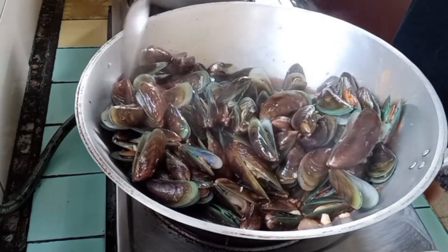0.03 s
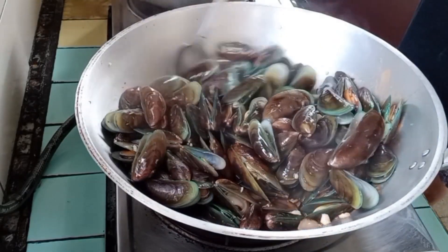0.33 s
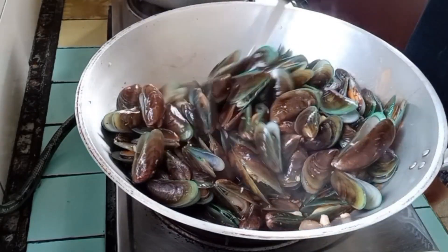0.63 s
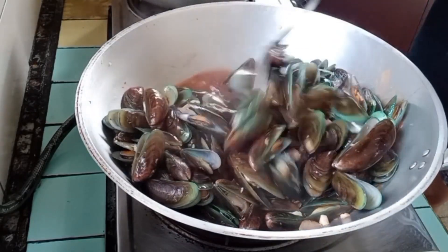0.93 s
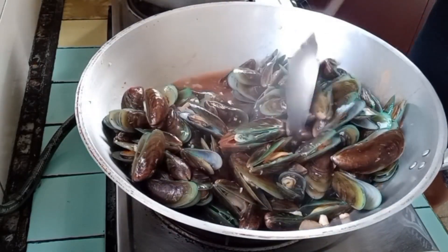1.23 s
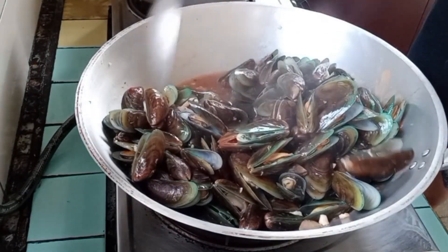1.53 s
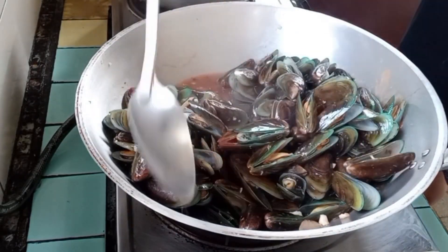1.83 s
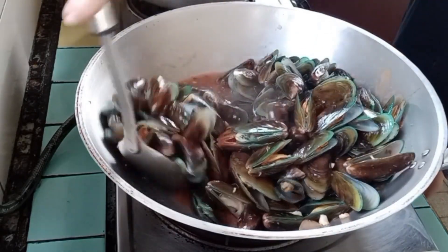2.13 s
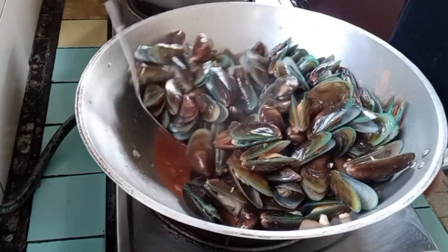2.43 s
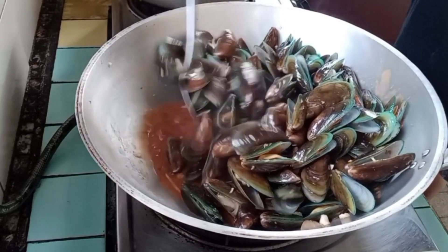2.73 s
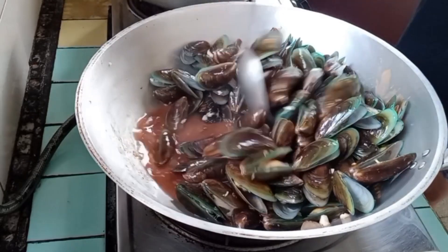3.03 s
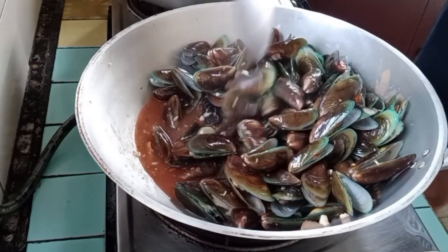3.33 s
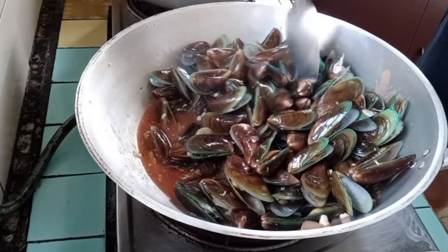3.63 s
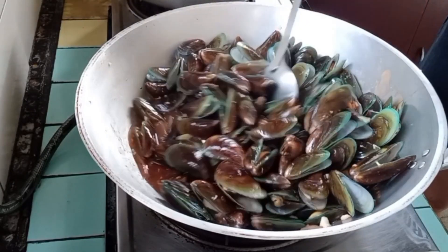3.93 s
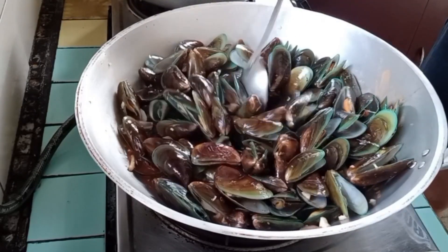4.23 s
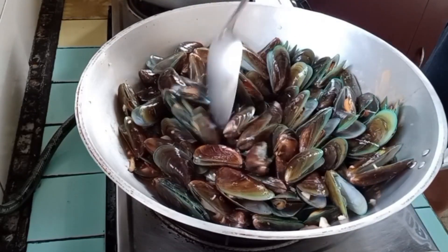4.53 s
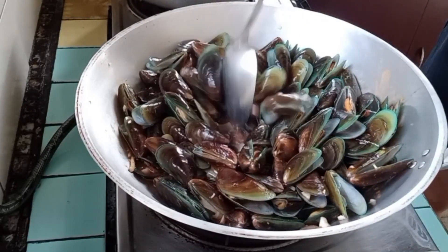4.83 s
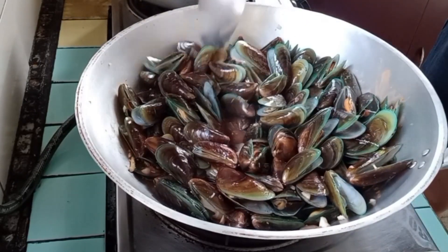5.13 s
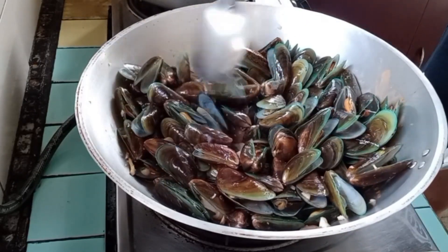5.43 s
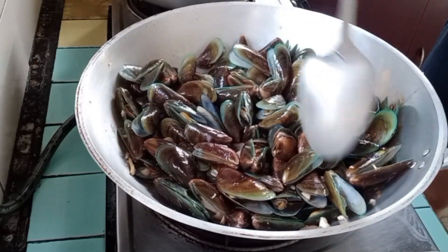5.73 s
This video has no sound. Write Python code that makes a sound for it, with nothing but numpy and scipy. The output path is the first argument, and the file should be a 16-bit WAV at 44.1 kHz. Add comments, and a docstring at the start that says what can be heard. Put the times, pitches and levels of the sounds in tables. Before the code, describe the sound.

A steel spoon turns mussels in sauce in an aluminium wok, heard close up with slight small-kitchen reverberation. From the start to about 1.1 seconds, hollow shells clack and grind, with bright spoon pings and wet squelches. Each knock makes the wok ring briefly, and the pushes bring a soft low rumble. The sound thins to a few shell ticks, almost stopping before 1.9 seconds. Stirring then resumes in uneven bursts, with light scraping and a strong clatter around 2.8 seconds. From 3.6 to 4.9 seconds the shells rattle busily and the sauce sloshes with deeper gulps; the loudest cluster of strikes comes at about 4.8 seconds. A faint low drone comes up from around 4.4 seconds and wavers to the end. Lighter clicks follow after 5 seconds, then sharp spoon hits and a short scrape at about 5.8 to 5.9 seconds.

```python
"""A steel spoon pings and hollow shells clack: mussels in sauce are turned in an aluminium wok, close by.
Each impact excites the damped modes of spoon and shells; sliding edges grind by friction.
Underneath, air pockets resonate in the sauce, the small ones as a squelch, the large ones as a gulp.
The bowl reflects each knock and rings briefly, and the small kitchen reverberates.
A faint low drone comes up towards the end."""
import sys
import numpy as np
from scipy import signal
from scipy.io import wavfile
from scipy.ndimage import uniform_filter1d

SR = 44100
rng = np.random.default_rng(int(sys.argv[2]) if len(sys.argv) > 2 else 0)


def bounce(signal):
    """Save signal as a 16-bit WAV file at the path given by the first command-line argument."""
    frames = np.transpose(np.atleast_2d(signal))
    limited = np.clip(frames, -1, 1)
    pcm = np.round(limited * 32767).astype(np.int16)
    wavfile.write(sys.argv[1], SR, pcm)


N = 263718
TIME = np.arange(N) / SR
RING_TIME = TIME[:8192]
ONSET = 220  # samples: an impact's level is set over its first 5 ms


def amp(db):
    """Amplitude ratio of a level in decibels."""
    return 10 ** (np.asarray(db) / 20)


def unit(x, size=None):
    """Normalisation to rms 1 over the first size samples."""
    return x / np.sqrt(np.mean(x[:size] ** 2) + 1e-20)


def value_at(points, hz):
    """Interpolation on a logarithmic frequency axis."""
    f, value = np.transpose(points)
    return np.interp(np.log(hz + 1), np.log(f), value)


def add(mix, start, sound):
    """Superposition of a sound on the mix, from start in seconds."""
    part = mix[max(round(start * SR), 0):][:len(sound)]
    part += sound[:len(part)]


def colour(x, spectrum, size=2048):
    """Minimum-phase filtering: the response is causal, so attacks stay sharp."""
    log_gain = np.log(amp(value_at(spectrum, abs(np.fft.fftfreq(size, 1 / SR)))))
    taps = np.fft.ifft(np.exp(np.conj(signal.hilbert(log_gain)))).real
    return signal.fftconvolve(x, taps[:size // 2])[:len(x)]


def waver(top_hz):
    """Slow fluctuation of rms 1: a sum of sinusoids in random phase."""
    t = TIME[::100]
    slow = sum(np.sin(2 * np.pi * (f * t + rng.random())) for f in np.geomspace(top_hz / 6, top_hz, 24))
    return unit(np.interp(TIME, t, slow))


def mode(hz, t60):
    """Free vibration of a damped oscillator, falling 60 dB in t60 seconds."""
    return np.sin(2 * np.pi * hz * RING_TIME) * np.exp(-np.log(1000) * RING_TIME / t60)


def ring(modes, spread_db):
    """Modal superposition: each mode's share and sign vary by chance, as with the point of contact."""
    return sum(amp(db + spread_db * rng.standard_normal()) * rng.choice([-1, 1]) * mode(hz, t60)
               for hz, db, t60 in modes)


def contact(t60, spectrum):
    """Rough contact: micro-impacts form a noise burst that builds up in about a millisecond."""
    t = RING_TIME[:len(RING_TIME) // 2]
    envelope = np.exp(-np.log(1000) * t / t60) * (1 - np.exp(-t / 0.001))
    burst = rng.standard_normal(len(t)) * envelope
    return np.pad(colour(burst, spectrum), (0, len(t)))


def scatter(grains, per_s, spread_db):
    """Shot noise: grains of uneven size arrive at random, levelled to a mean power near 1."""
    out = np.zeros(N)
    for grain in grains:
        sizes = amp(spread_db * np.minimum(rng.exponential(1, N), 3))
        arrivals = rng.random(N) < per_s / len(grains) / SR
        out += signal.oaconvolve(sizes * arrivals, grain)[:N]
    out = unit(out)
    power = uniform_filter1d(uniform_filter1d(out ** 2, size=1300), size=900)
    return out / np.sqrt(abs(power) + .03)


def effort(rows, column, attack_s, sag_db_per_s, release_db_per_s):
    """Incoherent addition: the envelopes of movements, each rising, sagging and dying, sum in power."""
    power, t = np.zeros(N), TIME[:SR]
    for row in rows:
        start, end = row[:2]
        fall_db = sag_db_per_s * t + release_db_per_s * np.maximum(t - (end - start), 0)
        add(power, start, (np.minimum(t / attack_s, 1) * amp(row[column] - fall_db)) ** 2)
    return np.sqrt(power)


# Spectrum of the room air: f/Hz, level/dB
AIR_SPECTRUM = [(20, -28.5), (70, -15), (120, 3.5), (170, -8), (400, -13.5), (1000, -17.5), (2300, -20.5),
                (4800, -35.5), (7700, -30), (9800, -35.5), (10900, -18), (11700, -47.5), (16000, -36)]
def room_air():
    """Stationary coloured noise forms the quiet floor of the room."""
    return amp(-76.5) * unit(colour(rng.standard_normal(N), AIR_SPECTRUM, size=8192))


# Course of the low drone: t/s, f/Hz, level/dB
DRONE_COURSE = [(4.1, 59.4, -94), (4.43, 60.56, -67.5), (4.87, 69.2, -57.5), (5.02, 68.3, -74.5),
                (5.12, 69.5, -61.5), (5.28, 69.5, -71), (5.6, 69.2, -58), (5.74, 71, -72.5),
                (5.86, 69.8, -60)]
def drone():
    """A low tone and its weaker octave waver by slow frequency and amplitude modulation."""
    times, hz, db = np.transpose(DRONE_COURSE)
    turns = np.cumsum(np.interp(TIME, times, hz) * (1 + 0.024 * waver(top_hz=4.7))) / SR
    octave = amp(-11 + 6.5 * waver(top_hz=12)) * np.sin(4 * np.pi * turns)
    level_db = np.interp(TIME, times, db) + 1.8 * waver(top_hz=16)
    return amp(level_db) * unit(np.sin(2 * np.pi * turns) + octave)


def echoes(delay_s, decay, per_s):
    """Impulse response of energy 1: sparse reflections, absorbed by band (decay: f/Hz, T60/s)."""
    t = TIME[:SR // 2]
    taps = rng.choice([-1., 1.], len(t)) * (rng.random(len(t)) < per_s / SR) * (t > delay_s)
    hz, age, bands = signal.stft(taps, SR, nperseg=128)
    absorption = np.exp(-np.log(1000) * age / value_at(decay, hz)[:, None])
    tail = signal.istft(bands * absorption, SR, nperseg=128)[1]
    return tail / np.linalg.norm(tail)


# Reverberation time of the kitchen: f/Hz, T60/s
KITCHEN_DECAY = [(150, 0.56), (500, 0.16), (1200, 0.31), (3000, 0.23), (8000, 0.22), (15000, 0.31)]
def kitchen(x):
    """Reverberation: the nearby walls return the sound from 8 ms on."""
    return amp(-9) * signal.oaconvolve(x, echoes(.008, KITCHEN_DECAY, per_s=4000))[:N]


def bowl(x):
    """Early reflections join the direct sound; seven patterns crossfade as the spoon wanders."""
    out = x.copy()
    for k in range(7):
        weight = np.cos(np.pi * np.clip((TIME * 6 - k + 1) % 7 - 1, -1, 1) / 2)
        reflections = echoes(.0014, [(300, 0.044), (12000, 0.022)], per_s=3000)
        out += amp(-7.5) * signal.oaconvolve(x * weight, reflections)[:N]
    return out


# Modes of the loaded wok: f/Hz, level/dB, T60/s
WOK_MODES = [(223, -4, .4), (310, -2, .45), (440, -6, .3), (560, -7, .3), (972, -3, .35), (1275, -3, .35),
             (1393, 0, .36), (1561, -2, .26), (1605, -6, .22), (1678, -5, .28), (1832, -1, .3),
             (1945, -2, .26), (2259, -2, .2), (2360, -3, .2), (2745, -6, .2), (3302, -3, .22),
             (3454, -3, .28)]
def wok_ring(x):
    """Forced vibration: the contents drive the modes of the pan."""
    pan = sum(amp(db) * rng.choice([-1, 1]) * mode(hz, t60) for hz, db, t60 in WOK_MODES)
    return amp(-19.5) * signal.oaconvolve(x, pan / np.linalg.norm(pan))[:N]


# Slides of the spoon on the pan: start t/s, end t/s, cavity f/Hz, level/dB
SPOON_SLIDES = [(2.197, 2.37, 820, -62.5), (2.435, 2.68, 856, -68), (3.102, 3.478, 820, -68),
                (5.246, 5.366, 960, -60.5), (5.847, 5.928, 995, -50)]
def slides():
    """Stick-slip friction at the spoon's edge excites the cavity between spoon and pan."""
    out = np.zeros(N)
    for start, end, hz, db in SPOON_SLIDES:
        size = int((end - start) * SR)
        slips = rng.standard_normal(size) * (rng.random(size) < 700 / SR)
        cavity = signal.fftconvolve(slips, mode(hz, t60=.028))[:size]
        add(out, start, amp(db) * unit(cavity) * signal.windows.tukey(size, .4))
    return out


def bubble(hz, cycles, rise):
    """Bubble resonance: an air pocket pulsates, rising in pitch as it nears the surface."""
    age = RING_TIME * hz / cycles  # 1 when 60 dB down
    turns = hz * RING_TIME * (1 + rise * np.minimum(age, 1))
    envelope = np.exp(-np.log(1000) * age) * (1 - np.exp(-hz * RING_TIME))
    return unit(np.sin(2 * np.pi * turns) * envelope)


# Sauce shoved aside and running back: start t/s, end t/s, squelch level/dB, gulp level/dB
SAUCE_SLOSHES = [(0.11, 0.2, -46.5, -67), (0.21, 0.31, -43, -66), (0.435, 0.55, -48.5, -64),
                 (0.7, 0.82, -60.5, -70), (0.89, 1.01, -50, -65), (2.06, 2.2, -50.5, -64),
                 (2.27, 2.33, -54.5, -84), (2.49, 2.57, -63.5, -77), (2.7, 2.77, -57, -81),
                 (2.78, 2.84, -49.5, -62), (2.98, 3.14, -46.5, -68.5), (3.27, 3.45, -68, -78),
                 (3.72, 3.82, -41, -58.5), (3.86, 4.04, -46, -55), (4.07, 4.25, -42, -40.5),
                 (4.33, 4.52, -49, -43.5), (4.76, 4.85, -42, -50), (5.24, 5.35, -80, -64.5),
                 (5.85, 5.92, -52, -81)]
def sauce():
    """Resonance falls with size: small bubbles squelch between shells, large ones gulp behind the spoon."""
    small = [bubble(hz, cycles=44, rise=0.26) for hz in np.geomspace(410, 1020, 26)]
    large = [bubble(hz, cycles=17, rise=0.25) for hz in np.geomspace(180, 400, 14)]
    shape = dict(attack_s=0.011, sag_db_per_s=83.5, release_db_per_s=173)
    squelch = effort(SAUCE_SLOSHES, column=2, **shape) * scatter(small, per_s=170, spread_db=0)
    gulp = effort(SAUCE_SLOSHES, column=3, **shape) * scatter(large, per_s=190, spread_db=-1.5)
    return squelch + gulp


# Contact spectrum of a shell's edge: f/Hz, level/dB
TICK_SPECTRUM = [(1500, -23), (3800, 5), (4800, -9.5), (5800, -4), (7600, 3), (9000, -6), (9600, -3),
                 (11000, -13), (13000, -11.5), (15500, -23.5)]
def tick(t60, top_hz):
    """Contact compliance acts as a low-pass: a softer touch of a shell's edge has less treble."""
    lowpass = signal.butter(2, min(top_hz, .45 * SR), fs=SR, output="sos")
    return unit(signal.sosfilt(lowpass, contact(t60, TICK_SPECTRUM)), ONSET)


# Contact spectrum of colliding shells: f/Hz, level/dB
CRACK_SPECTRUM = [(300, -33.5), (800, -0.5), (1500, -2), (3400, 4), (4200, -7.5), (5000, -24.5),
                  (8000, -27)]
def clack(hz, other_hz, cycles, other_db, crack_db):
    """Two hollow shells ring on impact; radiation is weak below the pitch of the larger one."""
    main = unit(mode(hz, cycles / hz), ONSET)
    other = rng.choice([-1, 1]) * unit(mode(other_hz, cycles / other_hz), ONSET)
    crack = unit(contact(0.03, CRACK_SPECTRUM), ONSET)
    band = signal.butter(3, [.66 * min(hz, other_hz), 4300], "band", fs=SR, output="sos")
    return unit(signal.sosfilt(band, main + amp(other_db) * other + amp(crack_db) * crack), ONSET)


# Contact spectrum of shell against metal: f/Hz, level/dB
SCRAPE_SPECTRUM = [(1500, -31.5), (3800, -4.5), (4800, -13), (5800, -5.5), (8200, 3.5), (9000, -2.5),
                   (9600, -5), (10600, -3.5), (12100, -12), (13800, -10.5), (15200, -12), (16000, -17)]
def scratch(t60):
    """Friction between hard, rough surfaces gives a bright burst of noise."""
    return contact(t60, SCRAPE_SPECTRUM)


# Modes of the steel spoon, damped by the food: f/Hz, level/dB, T60/s
STEEL_MODES = [(6010, -10, .05), (7290, -5, .08), (7607, -2, .13), (7990, -7, .05), (8450, -7, .04),
               (9082, -1, .1), (10430, -4, .07), (11108, -4, .09), (11815, -5, .05), (12090, -3, .07),
               (13000, -7, .04), (15000, -10, .03)]
def steel_ring(detune, spread_db):
    """Mass loading: the food shifts each mode of the spoon at random, by up to the fraction detune."""
    modes = [(hz * rng.uniform(1 - detune, 1 + detune), db, t60) for hz, db, t60 in STEEL_MODES]
    return ring(modes, spread_db)


def rocking():
    """Structure-borne noise: the pan rumbles on its stand."""
    spectrum = [(20, -1), (55, -4), (125, 19.5), (200, -39), (400, -47.5)]  # f/Hz, level/dB
    return amp(-25) * unit(colour(rng.standard_normal(N), spectrum, size=8192))


def grinding(gain):
    """Friction of edges: light contact crackles, harder pressure scrapes shell against metal."""
    ticks = [unit(tick(t60=0.0042, top_hz=hz)) for hz in np.geomspace(7000, 13000, 12)]
    scratches = [unit(scratch(t60=0.0037)) for _ in range(8)]
    crackle = scatter(ticks, per_s=710, spread_db=8)
    scrape = scatter(scratches, per_s=1600, spread_db=4.5)
    scrape_share = np.clip((20 * np.log10(gain + 1e-9) + 71) / 24, .05, .8)
    grit = gain * (np.sqrt(1 - scrape_share) * crackle + np.sqrt(scrape_share) * scrape)
    steel = steel_ring(detune=0, spread_db=1)  # dragged edges faintly excite the spoon
    return grit + amp(-16.5) * signal.oaconvolve(grit, steel / np.linalg.norm(steel))[:N]


def clatter():
    """Many small, independent collisions of shells merge into shot noise."""
    clacks = [clack(hz, hz * rng.uniform(0.727, 1.331), cycles=31, other_db=-1.5, crack_db=-6)
              for hz in np.geomspace(1100, 3100, 36)]
    return scatter(clacks, per_s=400, spread_db=3.5)


def loose_shells(per_s):
    """A sparse random process: tumbling shells land far enough apart to be heard singly."""
    out = np.zeros(N)
    lands = rng.random(N) < per_s / SR
    which = rng.integers(0, 12, N)
    for k, hz in enumerate(np.geomspace(1450, 3400, 12)):
        knock = clack(hz, hz * rng.uniform(0.42, 1.4), cycles=36, other_db=-12.5, crack_db=-3.5)
        knock += amp(-8) * tick(t60=0.0091, top_hz=12000)
        out += signal.oaconvolve(1. * (lands & (which == k)), knock)[:N]
    return amp(-1.5) * out


# Pushes of the spoon on the heap: start t/s, end t/s, clatter level/dB, grinding level/dB
HEAP_PUSHES = [(0.06, 0.1, -51, -54.5), (0.11, 0.2, -51, -48), (0.21, 0.28, -43.5, -46),
               (0.36, 0.43, -54, -60), (0.445, 0.5, -48, -56.5), (0.52, 0.67, -56, -77),
               (0.68, 0.88, -44, -59.5), (0.89, 1.05, -42.5, -51.5), (1.08, 1.17, -66.5, -67),
               (1.24, 1.38, -65.5, -69), (1.93, 1.96, -55.5, -67), (2.05, 2.16, -50, -53),
               (2.27, 2.32, -52, -57), (2.44, 2.68, -64, -74.5), (2.70, 2.77, -43.5, -55),
               (2.78, 2.87, -42, -57), (2.95, 3.06, -43, -59.5), (3.08, 3.18, -52, -63.5),
               (3.27, 3.44, -58, -71), (3.53, 3.59, -58.5, -59.5), (3.62, 3.72, -44.5, -50),
               (3.73, 3.81, -39, -51), (3.84, 3.9, -47.5, -59), (3.96, 4.28, -49.5, -68.5),
               (4.32, 4.39, -56, -60.5), (4.43, 4.54, -50, -54), (4.62, 4.7, -51.5, -70),
               (4.715, 4.88, -40, -52), (5.01, 5.04, -68, -79), (5.115, 5.18, -57.5, -65),
               (5.21, 5.35, -53.5, -61), (5.49, 5.6, -64.5, -65), (5.81, 5.93, -48.5, -49)]
def heap():
    """Granular flow: each push makes shells collide and grind. Returns their sound and the pan's rumble."""
    push = effort(HEAP_PUSHES, column=2, attack_s=0.0072, sag_db_per_s=18, release_db_per_s=274)
    grind = effort(HEAP_PUSHES, column=3, attack_s=0.0041, sag_db_per_s=28, release_db_per_s=277)
    collisions = push * (clatter() + loose_shells(per_s=20))
    return collisions + grinding(grind), push * rocking()


# Prominent knocks of shell on shell: t/s, first f/Hz, second f/Hz, clack level/dB, tick level/dB
SHELL_KNOCKS = [(0.1706, 2170, 1880, -41.5, -53), (0.279, 3100, 2640, -34.5, -54),
                (0.3399, 2650, 2190, -41, -41.5), (0.3644, 3120, 2280, -34, -38.5),
                (0.567, 2630, 3150, -38, -83.5), (0.667, 2770, 2297, -46, -59.5),
                (0.694, 1603, 1780, -29, -60), (0.7141, 1370, 2460, -39.5, -49),
                (0.751, 2730, 2410, -35.5, -47.5), (0.8611, 1720, 3320, -37.5, -51),
                (0.906, 2430, 1320, -32.5, -44.5), (0.9528, 3310, 3200, -35.5, -39),
                (0.9823, 2790, 3070, -35.5, -39.5), (1.018, 2200, 2580, -38.5, -37.5),
                (1.054, 3360, 2790, -35, -42), (1.206, 2730, 3550, -48.5, -57),
                (1.3177, 2600, 4280, -37.5, -46), (1.468, 2770, 3530, -50.5, -75),
                (1.5686, 2380, 3080, -63, -65.5), (2.2057, 2260, 1940, -39, -47),
                (2.2839, 3610, 2860, -39.5, -44), (2.504, 1310, 1790, -41.5, -65.5),
                (2.612, 1320, 1810, -45, -85), (2.8053, 1500, 1047, -29, -41),
                (2.823, 1496, 3760, -34.5, -60), (2.829, 3950, 1610, -37, -38),
                (2.8907, 1560, 2270, -40, -46), (2.9588, 2400, 2650, -34, -38),
                (3.021, 2130, 1450, -38.5, -63), (3.0653, 2060, 1710, -37, -70),
                (3.0973, 3380, 1440, -44, -50), (3.162, 3460, 2230, -53, -52),
                (3.2077, 2450, 3830, -48, -56), (3.2504, 2480, 2800, -39.5, -56.5),
                (3.284, 2860, 2330, -34, -44), (3.3285, 2020, 2520, -40.5, -57),
                (3.4033, 2480, 2030, -43.5, -48.5), (3.7394, 2280, 2570, -31.5, -54),
                (3.7579, 2890, 1326, -34.5, -39.5), (3.807, 2800, 1360, -37.5, -57),
                (3.8918, 2770, 2200, -37, -59), (3.9683, 3250, 1010, -40, -52),
                (4.0211, 1080, 1450, -42, -74), (4.079, 2370, 1860, -35.5, -62),
                (4.2362, 2280, 1920, -39.5, -57.5), (4.387, 2340, 4000, -42, -48),
                (4.4617, 3580, 3800, -35, -41), (4.5045, 1800, 2320, -36.5, -40),
                (4.6191, 2050, 2440, -41, -51.5), (4.6913, 2260, 1360, -39, -71),
                (4.7876, 3350, 1820, -22, -32), (4.7947, 1560, 1970, -30.5, -44),
                (4.9139, 3120, 1820, -41.5, -51), (5.2289, 3370, 3640, -43, -54),
                (5.281, 2300, 1570, -42.5, -44.5), (5.326, 3400, 3670, -45, -45),
                (5.46, 2620, 1590, -50, -52), (5.5602, 2850, 2400, -41, -58),
                (5.603, 2214, 3720, -33.5, -40.5), (5.9492, 3060, 2020, -41, -42)]
def shell_knocks():
    """Inelastic impact: one shell drops on another, then rocks back for a weaker second touch."""
    out = np.zeros(N)
    for start, hz, other_hz, clack_db, tick_db in SHELL_KNOCKS:
        knock = amp(clack_db) * clack(hz, other_hz, cycles=37.5, other_db=-4.5, crack_db=-16)
        add(out, start, knock)
        add(out, start + rng.uniform(.004, .011), amp(-11) * knock)
        top_hz = 13000 * 2 ** ((tick_db + 44.5) / 40)  # harder contacts are brighter
        add(out, start, amp(tick_db) * tick(t60=0.0065, top_hz=top_hz))
    return out


# Spectrum of the struck pan: f/Hz, level/dB
THUD_SPECTRUM = [(80, -15), (250, -14.5), (550, -7), (1000, 7.5), (1600, -16), (3000, -38)]
def thud():
    """The pan's transient response to a blow is a dull, heavily damped burst."""
    return unit(contact(0.025, THUD_SPECTRUM), size=600)


# Spoon strikes: t/s, struck body's main f/Hz, second f/Hz, clack level/dB, ping level/dB, thud level/dB
SPOON_STRIKES = [(0.1097, 2940, 3610, -37.5, -33.5, -54), (0.229, 2230, 2720, -31.5, -33.5, -57),
                 (0.2383, 2300, 2980, -31, -40, -59), (0.352, 1880, 3860, -40.5, -30, -47.5),
                 (0.8025, 2700, 1020, -44, -36, -55), (1.9303, 3670, 2500, -43.5, -40.5, -68),
                 (2.045, 2410, 3900, -43.5, -42, -62), (2.061, 2010, 3130, -35, -30, -52),
                 (2.1348, 1453, 2000, -37.5, -44.5, -53), (2.7814, 1436, 1830, -26.5, -40, -56),
                 (2.9498, 2150, 2760, -31, -51, -48), (3.6204, 1530, 2160, -57, -37, -58),
                 (4.314, 3570, 3000, -40, -39, -63), (4.43, 1373, 1930, -33.5, -32.5, -58),
                 (4.5344, 2570, 4100, -31, -35.5, -74), (4.7115, 2040, 1500, -37.5, -32, -72),
                 (4.7226, 1620, 1850, -27.5, -28.5, -54), (4.7602, 1700, 2380, -38.5, -33, -46.5),
                 (4.7673, 1586, 2250, -25, -27, -52), (4.84, 3240, 1840, -32.5, -35, -76),
                 (5.4947, 2880, 2510, -32.5, -42, -87.5), (5.8043, 2480, 2920, -29, -32.5, -72),
                 (5.8471, 2260, 3100, -25.5, -33, -42.5), (5.8916, 1925, 2180, -26.5, -38.5, -54)]
def spoon():
    """Impulsive excitation: each strike makes the steel ping, the struck body clack and the pan thud."""
    out = np.zeros(N)
    for start, hz, other_hz, clack_db, ping_db, thud_db in SPOON_STRIKES:
        steel = amp(-6.5) * unit(steel_ring(detune=.003, spread_db=3), ONSET)
        skid = amp(-8.5) * unit(scratch(t60=0.061), ONSET)  # the edge slides on after the strike
        impact = unit(scratch(t60=0.016), ONSET)
        add(out, start, amp(ping_db) * unit(impact + steel + skid, ONSET))
        add(out, start, amp(clack_db) * clack(hz, other_hz, cycles=36, other_db=-5, crack_db=-6))
        add(out, start, amp(thud_db) * thud())
    return out


def scene():
    """Source and resonator: the contents of the wok excite pan and room, over rumble, air and drone."""
    strikes = spoon() + shell_knocks()
    moving_shells, rumble = heap()
    cooking = bowl(strikes + moving_shells) + sauce() + slides()
    return (cooking + wok_ring(cooking) + kitchen(cooking) + rumble + room_air() + drone())[None]


def record(dry):
    """The microphone's frequency response has a dip in the upper mids and a band limit."""
    heard = colour(dry[0], [(3900, -0.5), (4800, -5.5), (5800, 0.5)])  # f/Hz, level/dB
    band_limit = signal.firwin(301, 15750, window=("kaiser", 9), fs=SR)
    return signal.oaconvolve(heard, band_limit, "same")[None]


dry = scene()
out = record(dry)
bounce(out)
```